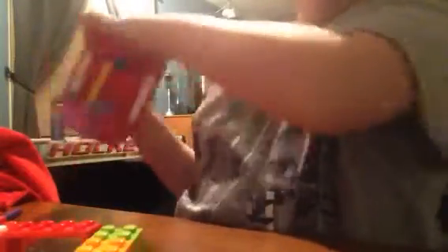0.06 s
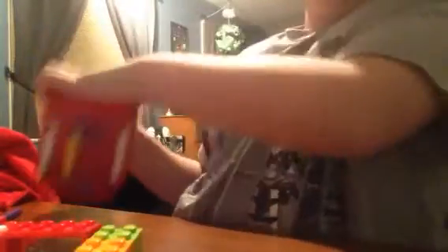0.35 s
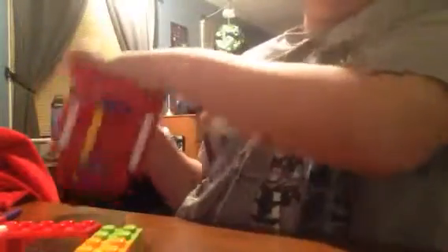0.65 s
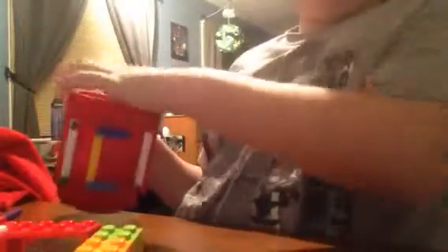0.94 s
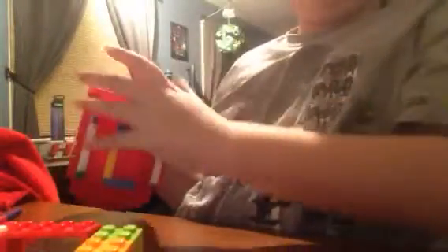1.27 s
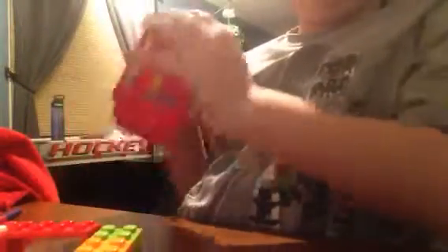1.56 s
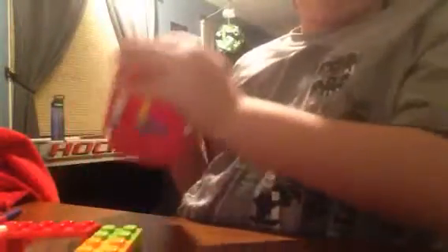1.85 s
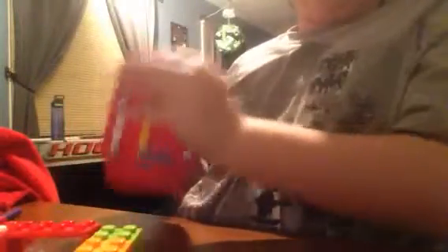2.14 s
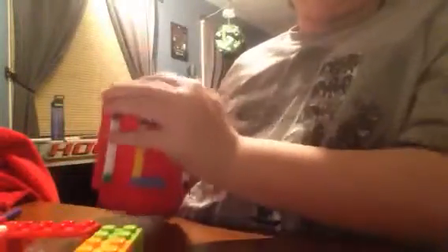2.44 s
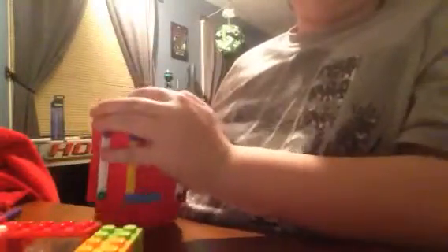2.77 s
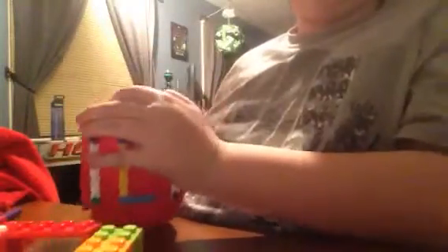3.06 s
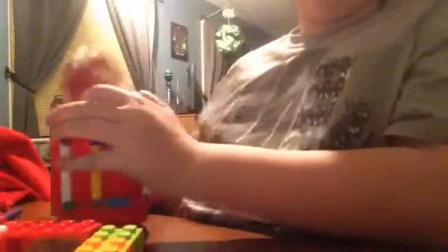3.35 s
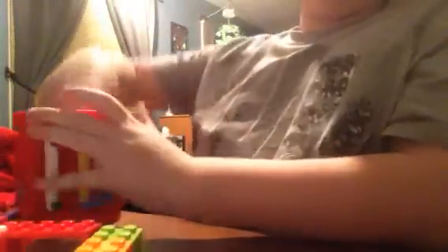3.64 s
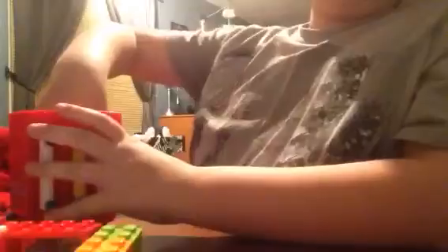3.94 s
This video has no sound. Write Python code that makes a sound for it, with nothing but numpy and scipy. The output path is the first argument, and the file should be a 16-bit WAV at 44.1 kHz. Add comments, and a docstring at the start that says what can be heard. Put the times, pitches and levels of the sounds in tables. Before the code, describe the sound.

Toy bricks clink and rattle in a plastic tub, shaken in two bouts close by in a small, quiet room. The tub then lands on a wooden table with a soft thump, followed by rubbing hands and sleeve rustle.

```python
"""Toy bricks shaken in a tub

A plastic tub of toy bricks is shaken in two bouts in a small room. On each stroke palms slap the lid in a quick
cluster while the bricks rattle inside: a noisy crack, a bright ring of the lid and a hollow note from the tub.
Fingers and loose bricks knock on the wall, and the heap slides and settles. The tub is set down on a wooden
table with a low thump, then hands rub and shift on it while a sleeve rustles, both in grainy noise."""
import sys
import numpy as np
from scipy import signal
from scipy.fft import rfft, irfft
from scipy.io import wavfile
from scipy.ndimage import uniform_filter1d

SR = 44100
rng = np.random.default_rng(int(sys.argv[2]) if len(sys.argv) > 2 else 0)


def dump(signal):
    """Clip the signal to [-1, 1] and save it as 16-bit WAV at the path in sys.argv[1]."""
    limited = np.clip(np.atleast_2d(signal).T, -1, 1)
    pcm = np.round(limited * 32767).astype(np.int16)
    wavfile.write(sys.argv[1], SR, pcm)


N = 176400
T = np.arange(N) / SR
AGE = T[:SR // 2]  # seconds since a hit

# a palm slapping the lid: start_s, ring_db, pitch_hz, upper_ring_db, crack_db, hollow_db
CONTACTS = [(0.0252, -9, 1880, -34, -13.5, -54), (.0315, -2, 1885, -38, -17, -32),
            (0.0388, -6, 1873, -21.5, -30, -39), (0.0629, -17.5, 1891, -29, -31, -63),
            (.2500, -15.5, 1848, -41, -28.5, -52), (0.2552, -6.5, 1905, -23, -22.5, -35.5),
            (.2710, -44.5, 1820, -24.5, -45, -42), (.4420, -29.5, 1842, -48, -51.5, -67),
            (.4480, -19.5, 1848, -52, -29.5, -40), (0.4597, -54, 1840, -55, -38, -38),
            (0.6529, -27.5, 1927, -39.5, -37.5, -57), (0.6549, -10.5, 1852, -41.5, -27.5, -45),
            (.6670, -18, 1841, -36, -37.5, -49), (.8160, -35, 1904, -47, -53, -50),
            (0.8242, -23, 1874, -40, -40, -45.5), (0.848, -28, 1860, -37.5, -44, -55),
            (.8610, -33, 1878, -70, -47, -50.5), (0.919, -39.5, 1800, -81.5, -58.5, -98),
            (1.7648, -13, 1921, -23.5, -27, -65), (1.7730, -16, 1924, -26.5, -29.5, -42),
            (1.7988, -23.5, 1907, -33, -37.5, -60), (1.9980, -50, 1910, -86, -53, -45.5),
            (2.0180, -47.5, 2000, -67.5, -47, -47.5), (2.1725, -23, 1844, -35, -37.5, -42.5),
            (2.1820, -27, 1992, -37, -37, -37), (2.202, -27, 1955, -35.5, -38, -44),
            (2.3503, -21, 1897, -30.5, -35.5, -62), (2.3580, -15.5, 1902, -33, -34.5, -35.5),
            (2.3690, -28, 1940, -39, -38.5, -66), (2.395, -24, 1895, -34, -44.5, -43)]
# main ring of the lid, retuned to each contact's pitch: pitch_hz, level_db, t60_s
LID_MODES = [(1877.4, 3, 0.089), (1917, -16.5, .05), (2015, -12.5, .09), (2227, -20.5, 0.12),
             (1950, -12.5, .06)]
# bright overtones of the lid's ring: pitch_hz, level_db, t60_s
UPPER_MODES = [(3780, -3.5, 0.071), (3695, -6.5, 0.1), (3521, -9, .07), (3280, -9.5, .06),
               (4100, -11.5, 0.051), (2640, -12, .06)]
# the crack with a hand flat on the lid: frequency_hz, level_db
FLAT_HAND_EQ = [(100, -40.5), (270, -35), (550, -15.5), (800, -11.5), (1100, -16.5), (1700, -5.5),
                (2600, -5), (3400, 0.5), (4800, -3.5), (5700, 1), (6650, -1.5), (7050, 9.5), (7400, -2),
                (8000, -6.5), (9600, -4.5), (11000, -15), (14500, -13.5), (15500, -21)]
# the crack with the hand gripped round the tub: frequency_hz, level_db
TIGHT_GRIP_EQ = [(100, -33.5), (400, -27.5), (800, 4), (1200, -11.5), (1800, 11.5), (2600, -4.5),
                 (3600, -1), (4800, -1.5), (6300, -3.5), (7100, 0.5), (7900, -8.5), (9600, -6),
                 (12500, -11), (15000, -15)]
# hands shifting their grip: middle_s, length_s, level_db
GRIP_SHIFTS = [(.12, 0.21, -61.5), (.36, .3, -66.5), (.62, 0.26, -72.5), (.92, 0.033, -65.5),
               (1.12, 0.5, -79), (1.48, .1, -69.5), (1.68, .2, -74), (2.55, .2, -77.5)]
# fader ride for the rubbing on tub and table: time_s, level_db
RUB_RIDE = [(3.08, -75.5), (3.125, -60.5), (3.155, -48), (3.18, -51.5), (3.246, -44), (3.30, -48),
            (3.355, -53.5), (3.375, -59), (3.44, -48), (3.56, -53.5), (3.615, -52.5), (3.68, -51),
            (3.76, -67), (3.782, -51), (3.81, -57.5), (3.86, -48), (3.94, -68.5), (4.0, -59)]
# low, boxy tone of the rubbing: frequency_hz, level_db
RUB_EQ = [(60, -28.5), (120, -11), (175, 0), (225, -2.5), (275, 1), (315, -9.5), (355, 3), (400, -7),
          (450, 6), (515, -9.5), (580, -3), (640, -10.5), (725, 2.5), (830, -10.5), (1350, -9),
          (1650, -19.5), (2000, -12), (2600, -21.5), (7000, -28.5), (15000, -36.5)]
# fingers and loose bricks on the wall: start_s, hollow_db, pitch_hz, tick_db
WALL_KNOCKS = [(0.155, -42.5, 507, -41.5), (0.199, -46, 460, -84), (0.351, -42.5, 500, -41),
               (0.368, -47.5, 412, -54), (.412, -42, 410, -53), (.424, -42, 685, -62),
               (0.519, -67.5, 434, -62), (0.608, -49, 450, -72), (1.850, -38, 707, -66.5),
               (2.025, -44.5, 690, -51), (2.443, -53, 770, -45.5), (2.510, -71.5, 720, -53),
               (2.8669, -42, 426, -65), (2.914, -50, 346, -52), (2.931, -89, 353, -54.5),
               (2.991, -50.5, 331, -61), (3.027, -46, 330, -53), (3.104, -43.5, 418, -79.5),
               (3.145, -34.5, 448, -61), (3.217, -61, 665, -61), (3.233, -38, 463, -42.5),
               (3.250, -38.5, 400, -56), (3.291, -36, 270, -49.5), (3.335, -38, 693, -65),
               (3.628, -65, 740, -37), (3.685, -32.5, 401, -73), (3.720, -40.5, 463, -74)]
# dull tick of a knock: frequency_hz, level_db
TICK_EQ = [(300, -9), (900, 4.5), (1700, 6), (2800, -11), (7000, -15), (15000, -29)]
# bricks sliding between strokes: middle_s, length_s, level_db
BRICK_SLIDES = [(.21, 0.081, -54), (.30, 0.04, -44.5), (.42, 0.15, -62), (.94, 0.15, -63),
                (1.24, 0.052, -69.5), (1.75, .03, -61.5), (2.02, 0.039, -61.5), (2.145, 0.041, -60.5),
                (2.56, .09, -64)]
# fine hiss of sliding bricks and of cloth: frequency_hz, level_db
HISS_EQ = [(1000, -18.5), (1650, -9.5), (1900, 3), (2300, -2.5), (4000, -6), (6500, -0.5), (10000, -5.5),
           (15000, -8.5)]
# the heap settling: middle_s, length_s, level_db
HEAP_SETTLES = [(1.08, 0.15, -66.5), (1.25, 0.063, -68.5), (1.47, .06, -68), (2.03, 0.051, -57.5),
                (2.14, 0.039, -58.5), (2.56, 0.091, -67), (3.61, 0.044, -55.5), (3.87, 0.062, -56.5)]
# soft tone of the heap: frequency_hz, level_db
HEAP_EQ = [(300, -11.5), (800, -4.5), (1400, -7), (1900, 2), (2300, -9), (2900, -6), (3800, -33),
           (9000, -11), (15000, -33)]
# the tub's base meeting the table: start_s, level_db
LANDINGS = [(2.8673, -36), (2.8761, -33), (2.904, -46.5), (3.037, -50.5), (3.114, -44), (3.133, -45),
            (3.148, -47), (3.289, -48.5), (3.576, -47), (3.685, -42.5), (3.777, -41)]
# wooden body of the table: pitch_hz, level_db, t60_s
TABLE_MODES = [(176, 3.5, 0.059), (135, -16.5, .08), (265.4, 1, 0.043), (390, -10, 0.027),
               (716, -11.5, 0.033)]
# fader ride for the sleeve: time_s, level_db
SLEEVE_RIDE = [(3.55, -78), (3.624, -56.5), (3.63, -44), (3.656, -59), (3.676, -49), (3.7, -60.5),
               (3.768, -68.5), (3.778, -56), (3.922, -54), (4.0, -60)]
# quiet room tone: frequency_hz, level_db
ROOM_TONE_EQ = [(30, -13.5), (100, -5.5), (180, -4.5), (300, -13), (380, -8), (550, -6.5), (730, -6.5),
                (1300, -10), (1950, -10.5), (2400, -15), (5000, -16), (14000, -16), (15500, -24)]

RING_RISE_S, CRACK_RISE_S = 0.0035, 0.00096
CRACK_T60_S, CAVITY_T60_S, KNOCK_T60_S, TICK_T60_S = 0.073, 0.042, 0.06, 0.023
REGRIP_S = 1.3  # the flat hand gives way to the tight grip
CAVITY_HZ = (539, 763)  # hollow of the tub: flat hand, tight grip
CHOKE_S, CHOKE_DB = (0.023, 0.0086), -7  # settling pieces damp the ring, sooner in the tight grip
RUB_TRIM_DB, SLEEVE_TRIM_DB, ROOM_TONE_DB = -1.5, -0.5, -67
ROOM_T60_S, ROOM_DB, PREDELAY_S = 0.28, -13.5, 0.011
CLIP_CEILING, LOW_CUT_HZ, HIGH_CUT_HZ = 1.4, 130, 15700


def amp(db):
    """Decibels to gain."""
    return 10 ** (np.asarray(db) / 20)


def fade(t60):
    """Half a second of decay, falling 60 dB every t60 seconds."""
    return np.exp(-np.log(1000) * AGE / t60)


def add(out, start_s, sound):
    """Drop a sound onto the track."""
    i = int(round(start_s * SR))
    out[i:i + len(sound)] += sound[:N - i]


def noise(eq, size, grain=0, grains_per_s=2000):
    """Noise at unit level through an EQ curve; grain roughens it with grains of random strength."""
    white, strength = rng.standard_normal((2, size))
    grainy = white * np.exp(grain * strength[(T[:size] * grains_per_s).astype(int)])
    hz, db = np.array(eq).T
    bin_hz = np.maximum(np.arange(size // 2 + 1) * SR / size, 1)
    gain = amp(np.interp(np.log(bin_hz), np.log(hz), db))
    shaped = irfft(rfft(grainy) * gain, size)
    return shaped / shaped.std()


def ring(modes, rise_s, stretch=1, scatter=0):
    """Struck modes bloom and die away; stretch transposes them all, scatter detunes each by chance."""
    detune = stretch * (1 + scatter * rng.standard_normal(len(modes)))
    tone = sum(amp(db) * fade(t60) * np.sin(2 * np.pi * hz * ratio * AGE)
               for (hz, db, t60), ratio in zip(modes, detune))
    return tone * (1 - np.exp(-AGE / rise_s))


def ride(points):
    """A smoothed fader move, silent before its first point."""
    times, db = np.array(points).T
    return uniform_filter1d(amp(np.interp(T, times, db, left=-120)), size=200)


def swells(rows):
    """Bell-shaped rises and falls of gain."""
    return sum(amp(db) * np.exp(-2 * ((T - middle) / length) ** 2) for middle, length, db in rows)


def lid_slaps():
    """Each slap cracks, rings the lid until the pieces settle, and stirs the air in the tub."""
    out = np.zeros(N)
    for start, ring_db, hz, upper_db, crack_db, hollow_db in CONTACTS:
        grip = int(start > REGRIP_S)
        burst = noise((FLAT_HAND_EQ, TIGHT_GRIP_EQ)[grip], len(AGE), grain=0.25)
        crack = burst * fade(CRACK_T60_S) * (1 - np.exp(-AGE / CRACK_RISE_S))
        hollow = ring([(CAVITY_HZ[grip], hollow_db, CAVITY_T60_S)], RING_RISE_S)
        choke = amp(CHOKE_DB * np.clip(2 * AGE / CHOKE_S[grip] - 1, 0, 1))
        main = choke * ring(LID_MODES, RING_RISE_S, stretch=hz / LID_MODES[0][0], scatter=0.009)
        upper = ring(UPPER_MODES, RING_RISE_S, scatter=0.0062)
        add(out, start, amp(ring_db) * main + amp(upper_db) * upper + amp(crack_db) * crack + hollow)
    return out


def hand_rubs():
    """Low, coarse friction: faint as the grip shifts, fuller once the tub is on the table."""
    friction = noise(RUB_EQ, N, grain=0.35, grains_per_s=260)
    return friction * (swells(GRIP_SHIFTS) + amp(RUB_TRIM_DB) * ride(RUB_RIDE))


def wall_knocks():
    """A light hit on the tub's wall gives a dull tick and a short hollow note."""
    out = np.zeros(N)
    for start, hollow_db, hz, tick_db in WALL_KNOCKS:
        tick = noise(TICK_EQ, len(AGE)) * fade(TICK_T60_S)
        hollow = ring([(hz, hollow_db, KNOCK_T60_S)], RING_RISE_S)
        add(out, start, hollow + amp(tick_db) * tick)
    return out


def brick_slides():
    """Bricks skid between strokes in short breaths of hiss."""
    return noise(HISS_EQ, N, grain=0.35) * swells(BRICK_SLIDES)


def heap_settles():
    """The heap of bricks beds down with a soft, gritty shuffle."""
    return noise(HEAP_EQ, N, grain=0.44) * swells(HEAP_SETTLES)


def table_thumps():
    """The tub lands and rocks, each touch sounding the low modes of the table top."""
    out = np.zeros(N)
    thump = ring(TABLE_MODES, rise_s=0.0008)
    for start, db in LANDINGS:
        add(out, start, amp(db) * thump)
    return out


def sleeve_rustle():
    """Brushing cloth gives a fine, grainy hiss."""
    return noise(HISS_EQ, N, grain=0.35) * amp(SLEEVE_TRIM_DB) * ride(SLEEVE_RIDE)


def room(direct):
    """A furnished room adds a short, dense tail."""
    fade_in = np.clip(AGE / PREDELAY_S - 1, 0, 1)
    tail = rng.standard_normal(len(AGE)) * fade(ROOM_T60_S) * fade_in
    return direct + amp(ROOM_DB) * signal.fftconvolve(direct, tail / np.linalg.norm(tail))[:N]


def scene():
    """Every layer plays into the room, over a bed of room tone, in mono."""
    foley = (lid_slaps() + hand_rubs() + wall_knocks() + brick_slides()
             + heap_settles() + table_thumps() + sleeve_rustle())
    return (room(foley) + amp(ROOM_TONE_DB) * noise(ROOM_TONE_EQ, N))[None]


def record(dry):
    """The microphone rounds the loudest peaks, drops the deep bass and cuts the top."""
    rounded = CLIP_CEILING * np.tanh(dry / CLIP_CEILING)
    low_cut = signal.butter(5, LOW_CUT_HZ, "high", fs=SR, output="sos")
    high_cut = signal.ellip(10, 0.2, 80, HIGH_CUT_HZ, fs=SR, output="sos")
    return signal.sosfilt(high_cut, signal.sosfilt(low_cut, rounded))


dry = scene()
out = record(dry)
dump(out)
```